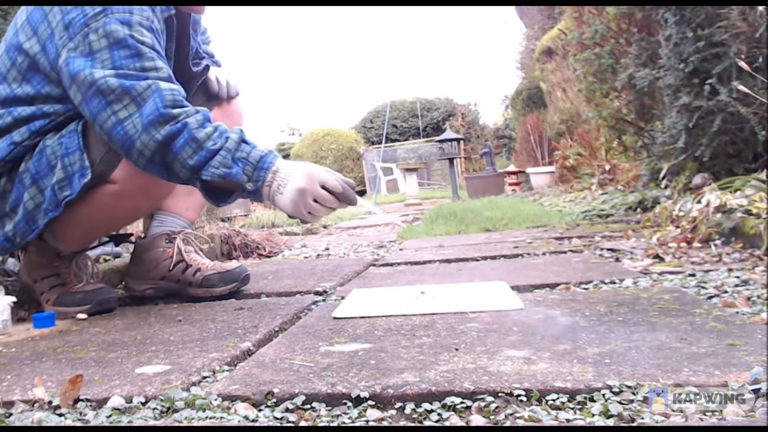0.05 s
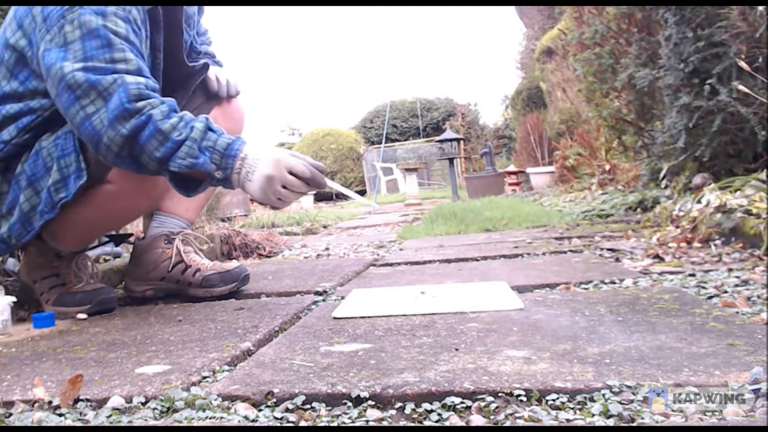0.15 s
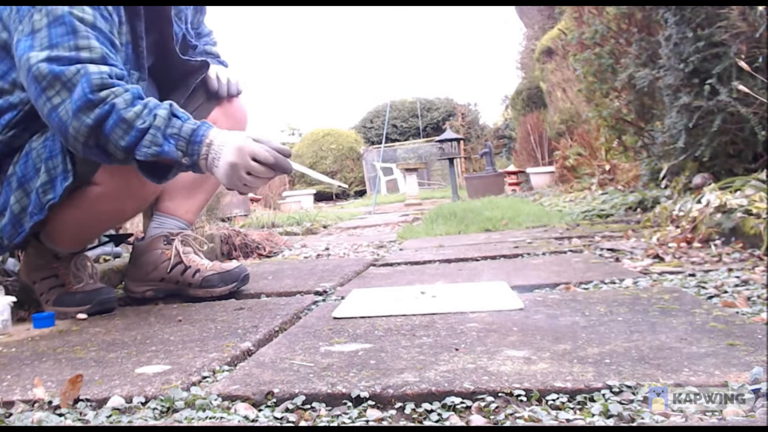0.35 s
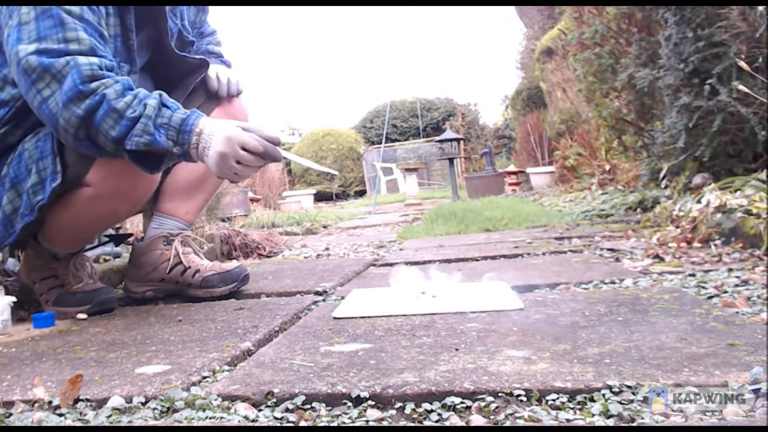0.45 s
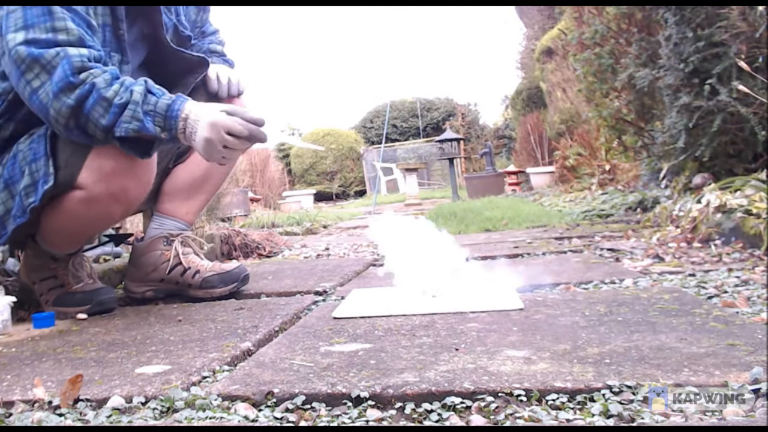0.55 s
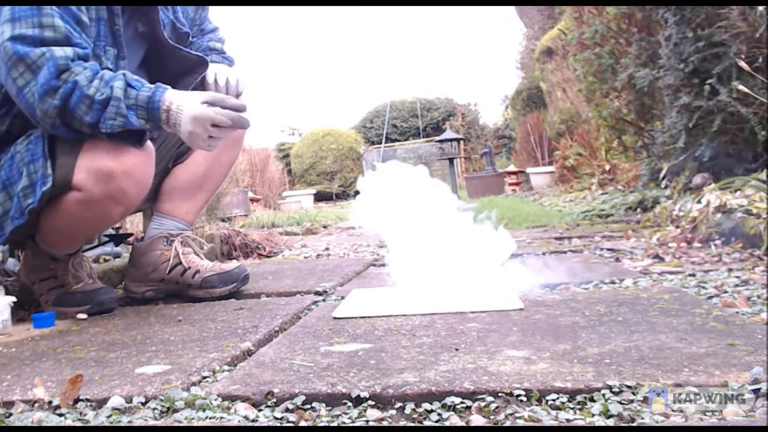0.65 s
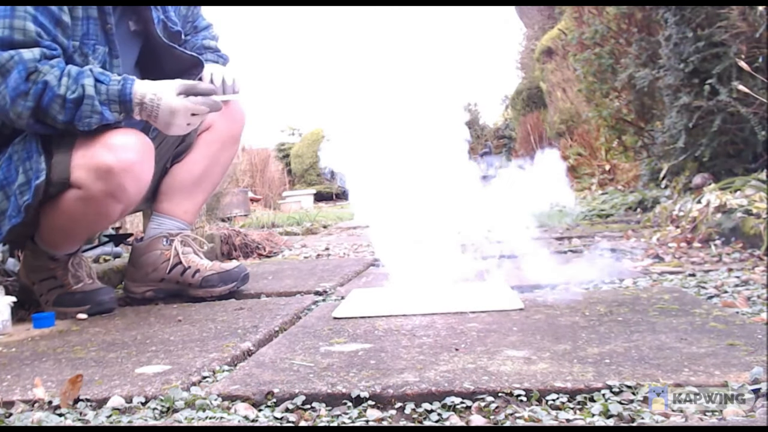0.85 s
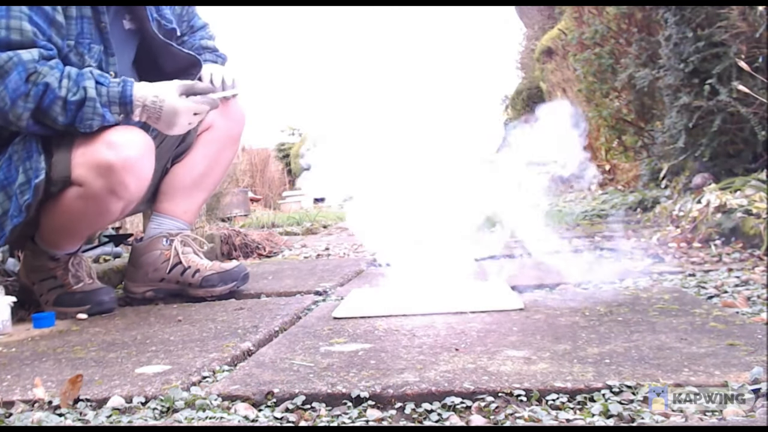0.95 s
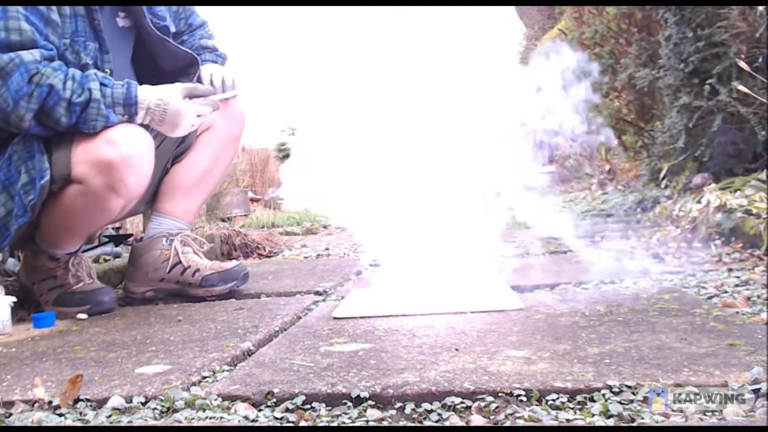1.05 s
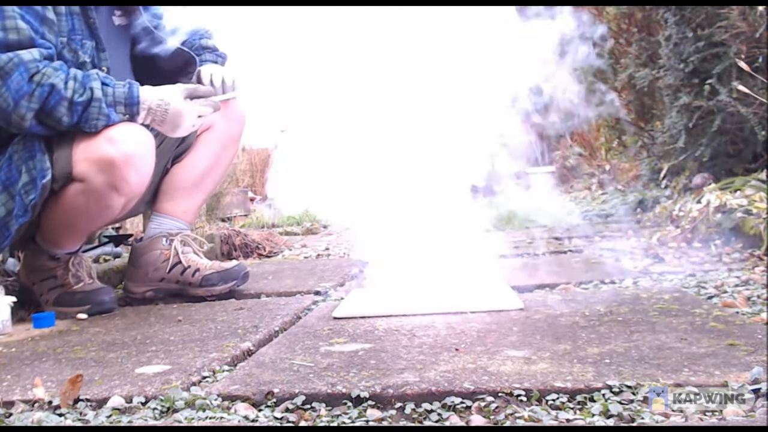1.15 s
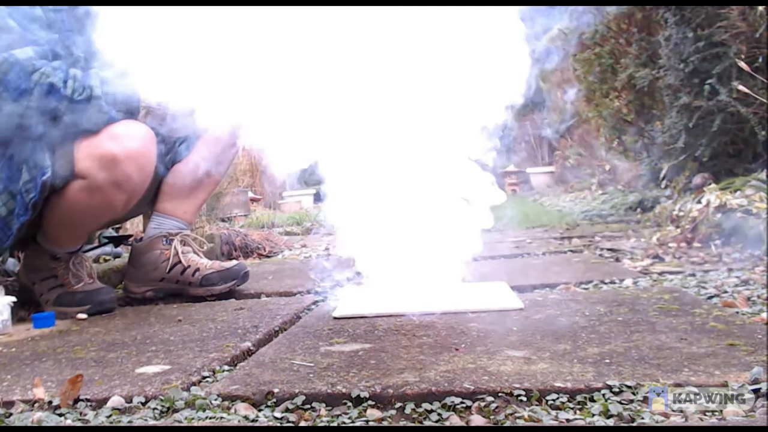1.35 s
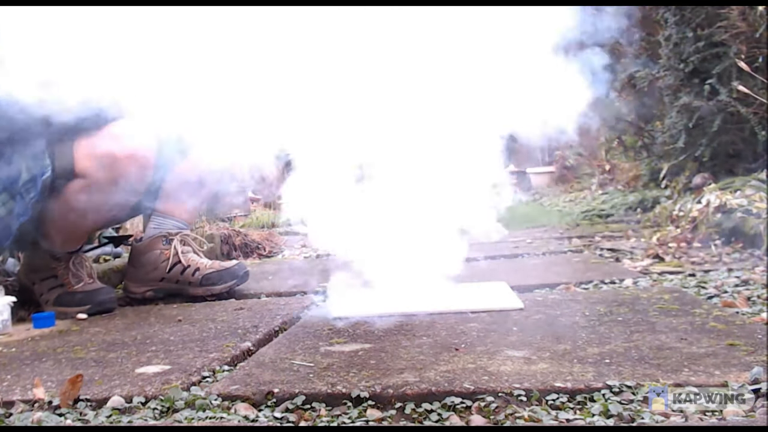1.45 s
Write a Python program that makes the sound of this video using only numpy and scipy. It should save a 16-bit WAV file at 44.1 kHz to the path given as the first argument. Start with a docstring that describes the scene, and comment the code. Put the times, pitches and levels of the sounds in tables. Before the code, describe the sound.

Abrupt fizzing whoosh of burning gas on a patio swells loudly, then chokes off to near silence

```python
"""On a patio slab in a quiet garden, a small heap of chemicals flares up: a thin fizz, then a roar of gas.
The burn is six bands of uneven noise, which die treble first. Slabs and walls add weak echoes.
Gas puffs thump as short, mostly low tones; the flame whoops in gliding breathy tones and hums as it gutters out.
Behind it lie soft garden air, two noisy rustles and two short, high, steady chirps.
A small camera with two close-set microphones hears it and holds down the peaks."""
import sys
import numpy as np
from scipy import signal
from scipy.fft import rfft, irfft, next_fast_len
from scipy.io import wavfile
from scipy.ndimage import uniform_filter1d, minimum_filter1d, map_coordinates

SR = 44100
rng = np.random.default_rng(int(sys.argv[2]) if len(sys.argv) > 2 else 0)


def field_ratio(decibels):
    """Amplitude ratio for a level in dB (20 dB per decade); scalars and array-likes work."""
    return 10 ** (np.asarray(decibels, dtype=float) / 20)


def dump_mix(stems):
    """Bounce the given channels to the path in sys.argv[1] as a 16-bit WAV at rate SR."""
    frames = np.atleast_2d(stems).T  # one column per channel
    limited = np.clip(frames, -1, 1)  # hard clip at full scale
    pcm = np.round(limited * 32767).astype(np.int16)
    wavfile.write(sys.argv[1], SR, pcm)


N = 66150  # length in samples: 1.5 s

# Levels of the big eddies in the burning gas, in stages: time_s, low_roar_db, whoosh_db
BIG_EDDIES = [
    [(0.1, -63.5, -75), (0.14, -57, -63), (0.156, -56, -42), (0.17, -42, -46), (0.174, -30, -31.5),
     (0.204, -32.5, -35), (0.214, -25.5, -28), (0.244, -33.5, -25), (0.26, -39, -27)],
    [(0.29, -34, -26.5), (0.39, -27, -22), (0.42, -25.5, -21), (0.44, -23, -24), (0.474, -23.5, -25.5),
     (0.492, -29, -18.5), (0.53, -20.5, -20.5), (0.596, -30.5, -23), (0.674, -20, -18.5),
     (0.926, -23.5, -14.5), (0.938, -19, -17), (1.0, -33, -19.5)],
    [(1.03, -27, -17.5), (1.042, -22.5, -18.5), (1.102, -26, -21), (1.15, -29, -28), (1.178, -34.5, -33),
     (1.2, -36, -47)],
    [(1.23, -48, -37.5), (1.24, -47, -47), (1.274, -43.5, -46), (1.318, -53, -46), (1.35, -45, -49),
     (1.434, -63, -57.5), (1.5, -53, -59.5)],
]
# Levels of the small eddies, in stages: time_s, hiss_db, fizz_db, sizzle_db
SMALL_EDDIES = [
    [(0.05, -76, -75, -85), (0.09, -71, -59.5, -59), (0.118, -53.5, -46, -46), (0.17, -34, -37.5, -34.5),
     (0.228, -33, -37, -33), (0.248, -23, -34, -30.5), (0.274, -31.5, -31, -26.5), (0.292, -27, -24, -28),
     (0.3, -22, -25, -29)],
    [(0.33, -23.5, -29, -27), (0.424, -21, -27.5, -26), (0.446, -22.5, -24, -26), (0.59, -19.5, -25, -25),
     (0.786, -17.5, -20.5, -20.5), (0.93, -16, -19, -23.5), (0.99, -17, -23, -25)],
    [(1.01, -17.5, -23, -28), (1.026, -16.5, -22.5, -26.5), (1.038, -23, -23, -36), (1.06, -20.5, -25, -44),
     (1.084, -19.5, -24.5, -47), (1.128, -23, -30, -46), (1.156, -27.5, -41, -47), (1.19, -49, -39, -50),
     (1.206, -49, -50, -51)],
    [(1.22, -41, -48, -51), (1.26, -46.5, -53, -57), (1.38, -52.5, -58, -59), (1.398, -58, -59, -54),
     (1.44, -60, -66, -64), (1.486, -57, -63.5, -59), (1.5, -63, -81, -65)],
]
# Level of the faint topmost treble, which flickers: time_s, level_db
TOP_FLICKER = [
    [(0.08, -82), (0.154, -49.5), (0.312, -50.5), (0.364, -40), (0.942, -41), (0.984, -61), (1.028, -45),
     (1.06, -52), (1.084, -43.5), (1.14, -45), (1.262, -62.5), (1.5, -78)],
]
# Tone colour of the burn; only the shape counts: frequency_hz, density_db (per Hz)
FLAME_COLOUR = [(15, -58), (25, -51), (53, -21.5), (216, -5), (261, -3), (360, -3.5), (401, -0.5),
                (459, -3.5), (634, 2), (746, 0), (1280, -2), (1390, -6), (2250, -3.5), (3350, -10),
                (4180, -13.5), (6440, -11), (7570, -14.5), (9390, -38.5), (11000, -35), (15700, -37.5)]
# The six bands of the burn, lowest first; a minus sign flips the curve:
# low_hz, high_hz, shared_puffing_db, own_flutter_db, patches_db, spits_db
EDDY_BANDS = [(15, 525, 0, 1.2, 2.5, 2), (563.7, 1453, -0.13, 0.22, 1.58, 0.5),
              (1447, 3060, -0.3, 0.4, 1, 0.65), (3065, 5240, -0.5, 0.67, 1, 0.1),
              (5430, 7650, 1.1, -0.43, 1.5, 0.96), (9460, 17200, 1.8, 0.5, 5.5, 1.3)]
# Tone colour of what differs between the microphones; only the shape counts: frequency_hz, density_db (per Hz)
WIDTH_COLOUR = [(35, -61), (60, -39), (405, 0), (477, -9), (958, -2), (1600, -11.5), (2120, -49),
                (2550, -80), (2930, -8.5), (3970, -2), (4460, -15), (5370, 1), (6940, -19), (9840, -8),
                (15700, -24)]
WIDTH_DB = -15  # relative to the burn's summed band levels
# Puffs of gas: centre_s, peak_db, pitch_hz, half_length_s
THUMP_LIST = [(.158, -34, 784, 0.0021), (.176, -30, 450, 0.0011), (.605, -24.5, 112, 0.012),
              (.69, -20, 212, 0.015), (.942, -10, 227, 0.0023), (.968, -21, 198, 0.0079),
              (1.15, -24.5, 176, 0.0045), (1.35, -34.5, 122, 0.0065)]
# Hollow gliding tones as the flame lights and dies:
# centre_s, half_length_s, level_db, centre_pitch_hz, glide_hz_per_s, breath_points_per_s, breath_to_tone_ratio
WHOOP_LIST = [(.124, 0.028, -49, 520, 4300, 110, 0.28), (1.166, 0.03, -33, 2200, -9000, 1000, 2.2),
              (1.166, 0.034, -45, 4900, -1500, 1500, 2.5), (1.24, 0.05, -49, 1950, -1500, 450, 1.8),
              (1.28, 0.02, -52, 900, 0, 300, 1.5)]
# Path of the hum as the flame gutters out: time_s, pitch_hz, level_db
HUM_PATH = [(1.165, 375, -55), (1.19, 355, -36), (1.215, 346, -36), (1.24, 360, -43), (1.262, 405, -40),
            (1.283, 415, -39.5), (1.3, 430, -58)]
# Echoes off nearby surfaces, relative to the direct sound: delay_s, level_db
ECHO_LIST = [(.0027, -28.5), (.0034, -33), (.0045, -22.5), (.0085, -27), (.0091, -20.5), (0.014, -20),
             (0.0182, -19.5), (.0203, -17)]
# Tone colour of the garden air; only the shape counts: frequency_hz, density_db (per Hz)
GARDEN_COLOUR = [(24, -37), (40, 1), (288, 7), (802, -20), (1230, -30), (1570, -20), (6220, -10),
                 (8180, -25), (10200, 3.5), (15700, -61)]
GARDEN_DB = -65  # level of the air's shared part
# Leaves or cloth: centre_s, level_db, half_length_s
RUSTLE_LIST = [(0.041, -57.5, 0.011), (1.39, -61.5, .012)]
# Tone colour of the rustles; only the shape counts: frequency_hz, density_db (per Hz)
RUSTLE_COLOUR = [(880, -60), (1500, -22), (2960, -7), (4410, -12), (4970, -9), (8000, -25), (10400, -59),
                 (17600, -120)]
# Short high chirps: centre_s, peak_db, pitch_hz, half_length_s
CHIRP_LIST = [(.287, -24, 4100, .011), (.473, -21.5, 4100, .008)]


def unit(x):
    """Scale a sound to an rms (average strength) of 1."""
    return x / np.sqrt(np.mean(x ** 2) + 1e-20)


def along(points, hz):
    """Read a curve of (frequency, value) points on a log frequency axis."""
    f, value = np.transpose(points)
    return np.interp(np.log(hz + 1), np.log(f + 1), value)


def wobble(points_per_s):
    """A smooth random curve through so many random points a second."""
    return map_coordinates(rng.standard_normal(N // 20), [np.arange(N) * points_per_s / SR])


def swell(centre_s, half_s):
    """A bell-shaped rise and fall, down to 37 % at half_s from its centre."""
    return np.exp(-((np.arange(N) / SR - centre_s) / half_s) ** 2)


def gains(stages):
    """Join the stages and turn each level column into a gain for every sample."""
    time_s, *columns = np.vstack(stages).T
    t = np.arange(N) / SR
    return [field_ratio(np.interp(t, time_s, level_db)) for level_db in columns]


def filtered(x, response):
    """Change each frequency of x by the given response."""
    size = next_fast_len(N + SR // 4)  # spare room, so that echoes do not wrap round
    spectrum = rfft(x, size) * response(np.fft.rfftfreq(size, 1 / SR))
    return irfft(spectrum, size)[..., :N]


def blips(rows):
    """Short tones of steady pitch, each under its own swell."""
    t = np.arange(N) / SR
    return sum(field_ratio(peak_db) * swell(centre_s, half_s) * np.sin(2 * np.pi * hz * (t - centre_s))
               for centre_s, peak_db, hz, half_s in rows)


def rush(colour, patchy_db, spit_db, low_hz=0, high_hz=30000):
    """Turbulent gas: coloured noise of rms 1 between soft edges, uneven in time and pitch, with short spits."""
    spitting = rng.standard_normal(N) * field_ratio(spit_db * wobble(600))
    grid = signal.stft(spitting, nperseg=512)[2]  # rows are frequencies, columns are moments
    # blurred random numbers make patches that are louder or softer
    patches = rng.standard_normal(grid.shape)
    patches = uniform_filter1d(patches, size=6, axis=0)
    patches = uniform_filter1d(patches, size=6, axis=1)
    patchy = signal.istft(grid * field_ratio(patchy_db * unit(patches)), nperseg=512)[1][:N]

    def band(hz):
        low_edge = 1 + (low_hz / (hz + 1)) ** 20
        high_edge = 1 + (hz / high_hz) ** 20
        return field_ratio(along(colour, hz)) / np.sqrt(low_edge * high_edge)

    return unit(filtered(patchy, band))


def burn():
    """Eddies of six sizes make six noise bands that puff partly together; returns centre and width."""
    levels = np.array(gains(BIG_EDDIES) + gains(SMALL_EDDIES) + gains(TOP_FLICKER))
    puffing = wobble(24.965)
    centre = np.zeros(N)
    for level, (low_hz, high_hz, shared_db, own_db, patchy_db, spit_db) in zip(levels, EDDY_BANDS):
        unsteady = field_ratio(shared_db * puffing + own_db * wobble(14.05))
        centre += level * unsteady * rush(FLAME_COLOUR, patchy_db, spit_db, low_hz, high_hz)
    strength = np.sqrt(np.sum(levels ** 2, axis=0))
    width = strength * field_ratio(WIDTH_DB) * rush(WIDTH_COLOUR, patchy_db=5.5, spit_db=5.5)
    return centre, width


def patio(x):
    """Slabs and walls return weak, late copies; the sum is scaled down for the power they add."""
    def echo(hz):
        return 1 + sum(field_ratio(db) * np.exp(-2j * np.pi * hz * delay_s) for delay_s, db in ECHO_LIST)

    total_power = 1 + sum(field_ratio(2 * db) for _, db in ECHO_LIST)
    return filtered(x, echo) / np.sqrt(total_power)


def thumps():
    """Puffs of gas push the air in short, mostly low tones."""
    return blips(THUMP_LIST)


def whoops():
    """The lighting and dying flame makes gliding tones, roughened by random breath."""
    out, t = np.zeros(N), np.arange(N) / SR
    for centre_s, half_s, db, hz, glide, breath_rate, breath in WHOOP_LIST:
        since = t - centre_s
        phase = 2 * np.pi * (hz * since + glide * since ** 2 / 2)
        tone = (1 + breath * wobble(breath_rate)) * np.sin(phase)
        tone += breath * wobble(breath_rate) * np.cos(phase)
        out += field_ratio(db) * swell(centre_s, half_s) * tone
    return out


def hum():
    """The guttering flame makes one unsteady tone that sags, then rises and stops."""
    time_s, pitch_hz, level_db = np.transpose(HUM_PATH)
    t = np.arange(N) / SR
    pitch = np.interp(t, time_s, pitch_hz) + 12 * wobble(59.93)  # drifts by some 12 Hz
    phase = 2 * np.pi * np.cumsum(pitch) / SR
    level = np.interp(t, time_s, level_db, left=-120, right=-120) + 0.92 * wobble(69.8)
    return field_ratio(level) * np.sqrt(2) * np.sin(phase)  # the root of 2 makes the level an rms level


def chirps():
    """Two short high tones of steady pitch."""
    return blips(CHIRP_LIST)


def rustles():
    """Leaves or cloth: brief swells of coloured noise."""
    swells = sum(field_ratio(db) * swell(centre_s, half_s) for centre_s, db, half_s in RUSTLE_LIST)
    return swells * rush(RUSTLE_COLOUR, patchy_db=4.0, spit_db=0.0)


def garden():
    """Distant air as soft noise, with a shared part and a weaker part that differs between the microphones."""
    shared = field_ratio(GARDEN_DB) * rush(GARDEN_COLOUR, patchy_db=3, spit_db=1)
    differing = field_ratio(GARDEN_DB - 6) * rush(GARDEN_COLOUR, patchy_db=4, spit_db=1)
    return shared, differing


def scene():
    """Add everything up as centre and width, then turn these into left and right."""
    burn_centre, burn_width = burn()
    air, air_width = garden()
    mid = patio(burn_centre) + thumps() + whoops() + hum() + chirps() + rustles() + air
    side = burn_width + air_width
    return np.array([mid + side, mid - side])


def top_cut(x):
    """Nothing passes above the cut-off."""
    return signal.sosfilt(signal.butter(12, 15820, fs=SR, output="sos"), x)


def record(dry):
    """The camera turns both sides down around loud peaks, then cuts off the highest treble."""
    ceiling_db, reaction_s, top_hz = -1.6, .0015, 15730
    span = round(reaction_s * SR)
    peak = np.abs(dry).max(axis=0)
    needed = np.minimum(1, field_ratio(ceiling_db) / (peak + 1e-9))
    # hold the lowest gain around each peak, then smooth it twice
    gain = minimum_filter1d(needed, size=2 * span)
    gain = uniform_filter1d(gain, size=span)
    gain = uniform_filter1d(gain, size=span)
    finished = filtered(dry * gain, lambda hz: hz < top_hz)
    return top_cut(finished)


dry = scene()
out = record(dry)
dump_mix(out)
```